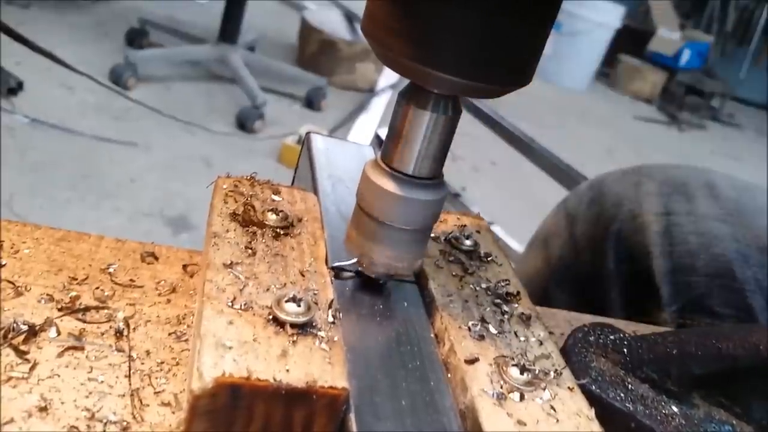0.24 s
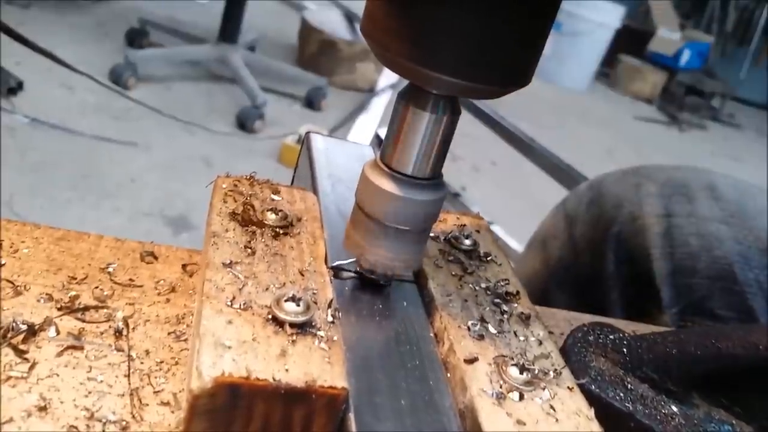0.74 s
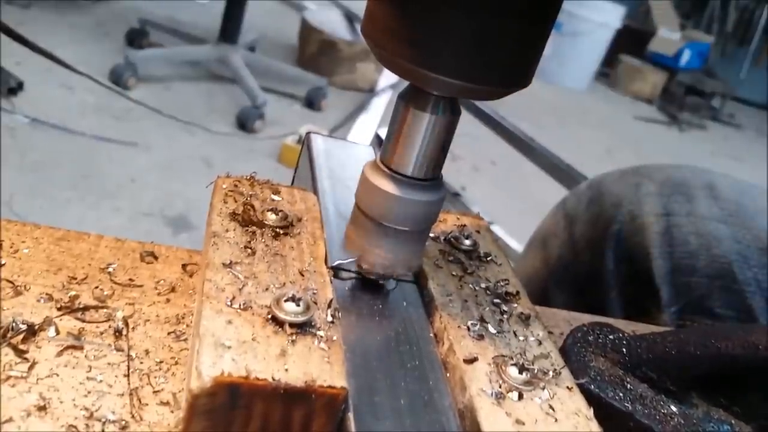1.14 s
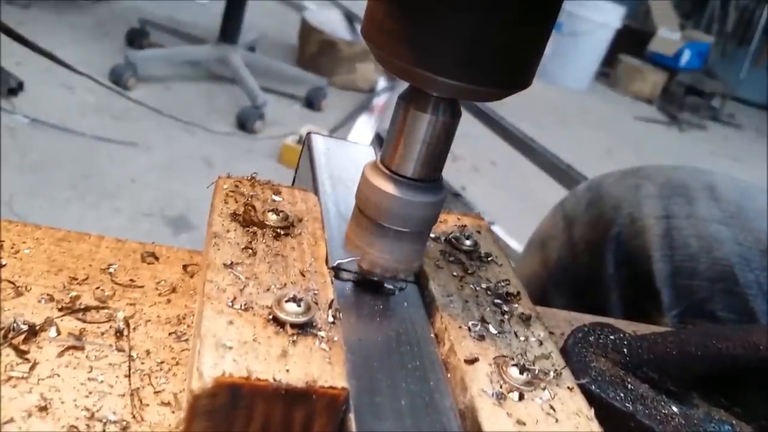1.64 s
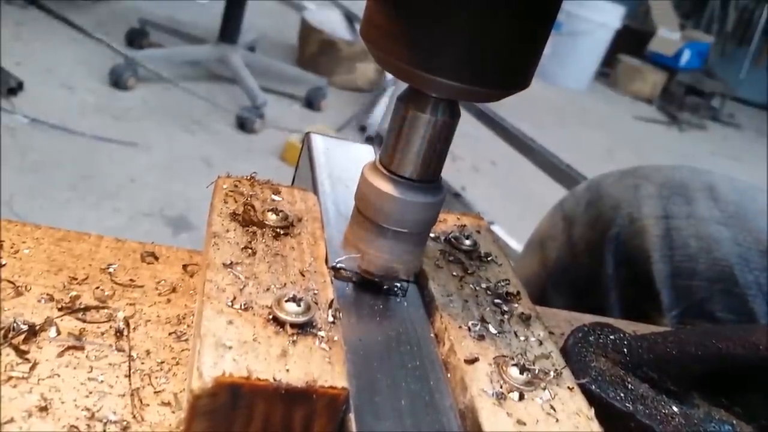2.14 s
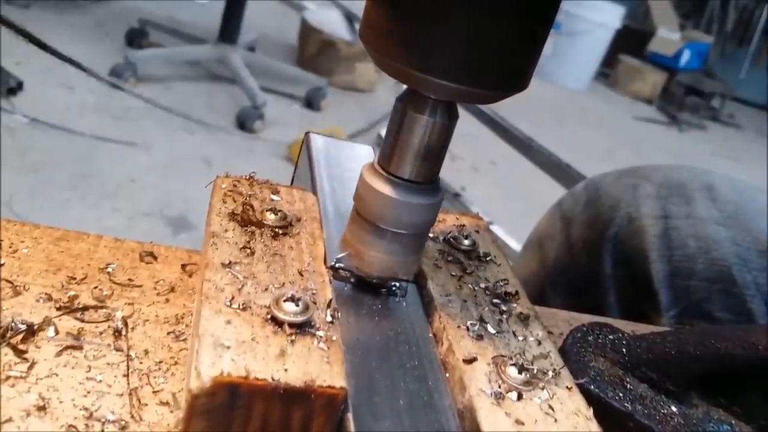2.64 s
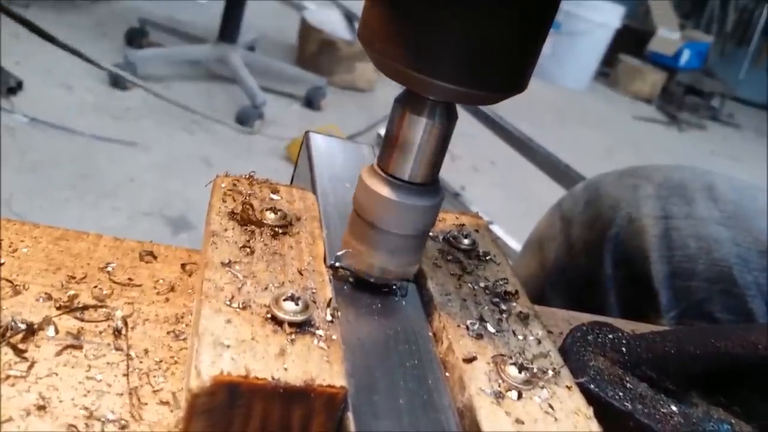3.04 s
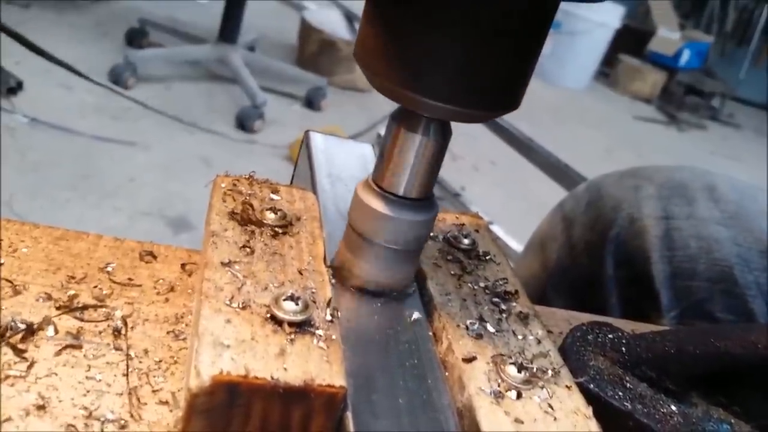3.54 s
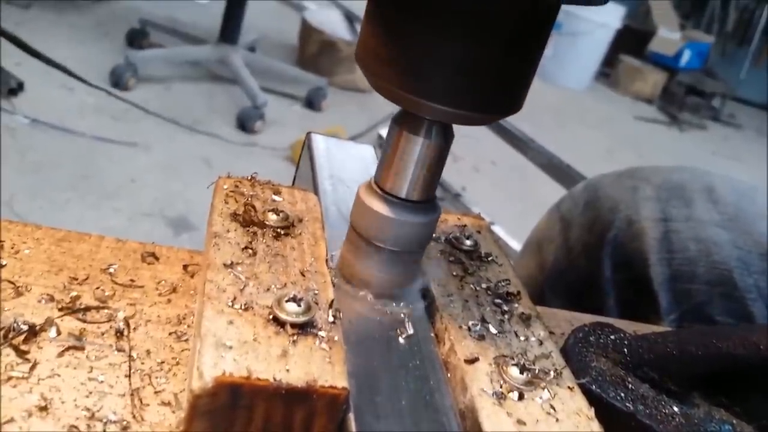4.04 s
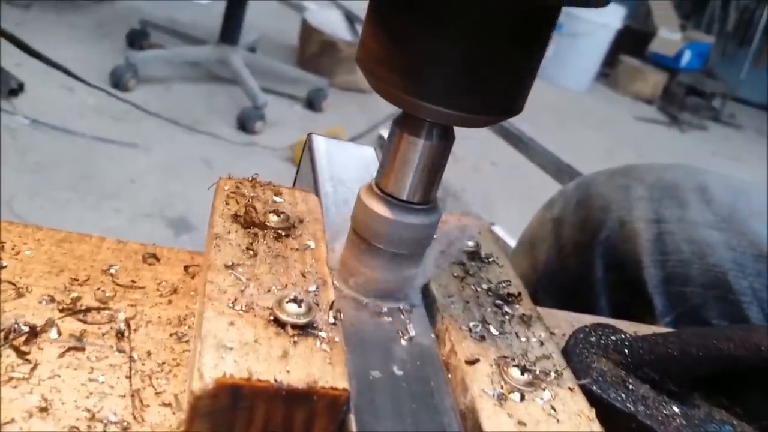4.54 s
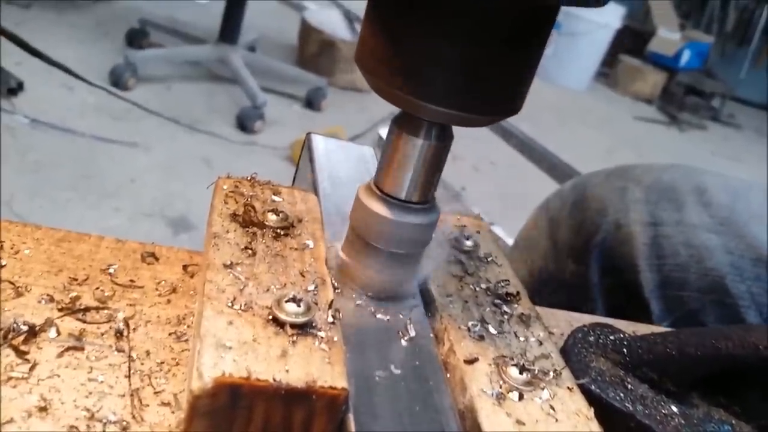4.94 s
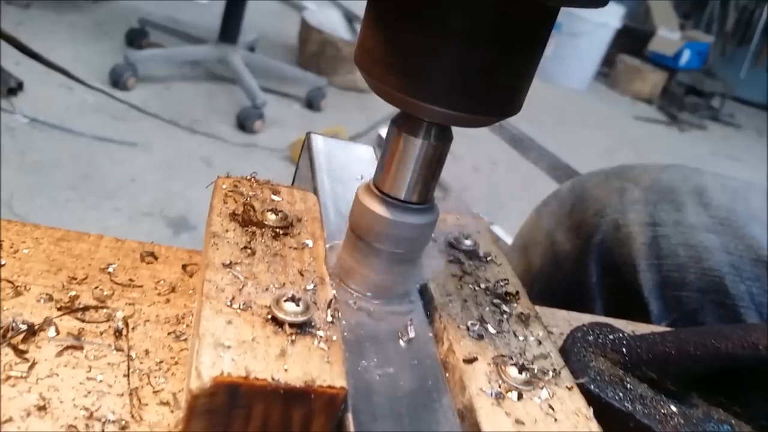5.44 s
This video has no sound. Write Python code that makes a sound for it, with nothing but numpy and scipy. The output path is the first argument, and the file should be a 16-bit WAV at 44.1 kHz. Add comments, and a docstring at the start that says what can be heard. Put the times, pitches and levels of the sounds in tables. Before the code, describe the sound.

In a workshop, very close, a hole saw cuts a clamped steel tube: bright gritty hiss, coarse rasp, snapping chips, low motor hum and bench rumble. A sharp clacking knock comes early. The cut grows harsher, with ringing chatter and rattle, then eases into smooth scraping and tiny high chirps. A loud, piercing squeal takes over, throbbing quickly and turning hoarse until the end.

```python
"""A hole saw in a drill press, close by, cuts a steel tube clamped on a wooden bench: brittle fracture tears chips
in a gritty hiss of random impulses, and excited modes make the tube rasp and ring as the cut deepens.
When the teeth stop biting and rub, thin chirps once a turn lead into a loud squeal, a stick-slip tone
with overtones that throbs twice a turn, hoarse at times with judder.
Beneath lie the motor's hum, bench rumble, a loose rattle, one sharp knock and two softer blows, all damped modes or noise."""
import sys
import numpy as np
from scipy import signal
from scipy.fft import rfft, irfft
from scipy.io import wavfile
from scipy.ndimage import uniform_filter1d, minimum_filter1d, map_coordinates

SR = 44100
rng = np.random.default_rng(int(sys.argv[2]) if len(sys.argv) > 2 else 0)


def transcribe(u):
    """Save the signal u as a 16-bit wav file named by the first command-line argument.

    u: samples, shape (n,) or (channels, n), limited to [-1, 1]; the rate is SR.
    q: integer samples, one column per channel.
    """
    v = np.clip(np.atleast_2d(u).T, -1, 1)
    q = np.round(v * 32767).astype(np.int16)
    wavfile.write(sys.argv[1], SR, q)


N = 251370
TIME = np.arange(N) / SR  # s

# Feed of the saw into the steel. Each row: time in seconds, relative hiss level in dB.
FEED = [(0, -23), (.78, -24), (1.28, -28), (1.55, -27), (2.0, -23.5), (2.5, -22.5), (3.0, -23.5),
        (3.65, -23.5), (4.0, -28), (4.22, -25.5), (4.4, -21.5), (4.9, -22.5), (5.4, -21.5), (5.7, -23.5)]
# Short squeaks of single teeth. Each row: peak time in seconds, pitch in Hz, nominal level in dB,
# half length in seconds.
SQUEAKS = [(2.123, 1730, -32, 0.019), (2.602, 1086, -32, 0.017), (2.883, 8630, -22, 0.015),
           (3.712, 14200, -12.5, 0.016), (3.824, 14140, -11, 0.016), (3.948, 14220, -8, 0.012),
           (4.069, 14150, -20, .005), (4.06, 11800, -24.5, 0.011), (4.073, 2190, -28.5, 0.0056),
           (4.103, 2130, -31.5, 0.0078), (4.126, 3150, -35.5, 0.019), (4.195, 11850, -22, 0.011),
           (4.256, 11900, -20.5, 0.016), (4.62, 11970, -21.5, 0.0073), (4.971, 6980, -17.5, 0.01),
           (5.19, 6300, -33, .007), (5.32, 6430, -27, 0.008), (5.322, 2080, -36.5, .008),
           (5.35, 7100, -20, 0.0068), (5.374, 2160, -29.5, .011), (5.376, 10600, -27, .011),
           (5.462, 2105, -35, 0.013), (5.465, 6800, -19, 0.0086), (5.508, 6300, -26, 0.0072),
           (5.509, 2116, -35, 0.01), (5.615, 6530, -38, 0.0062), (5.631, 2070, -33.5, 0.021),
           (5.632, 4120, -24, 0.014), (5.678, 6700, -21, 0.004)]
# The largest chips snapping off. Each row: time in seconds, relative peak in dB.
SNAPS = [(.09, -7), (0.114, -14), (.5038, -19), (.622, -14), (0.647, -3), (.651, -24), (0.924, -10),
         (1.1558, -13), (1.789, -10.5), (1.906, -13), (1.9974, -17), (2.6644, -10), (2.765, -10),
         (2.769, -10), (3.008, -11), (3.199, -1), (3.3029, -22), (3.318, -8), (3.416, -6), (3.465, -9),
         (3.5085, -9), (3.5493, -6)]
# Damped modes rung by a blow. Each row: frequency in Hz, relative level in dB, 60 dB decay time in seconds.
KNOCK_MODES = [(273.5, -31, 0.88), (375, -33, 0.62), (615, -26, 0.23), (678, -18, 0.18), (800, -28, .13),
               (950, -28, 0.1), (1060, -1, 0.0081), (1130, -34, .12), (1285, -24, 0.28),
               (1370, -16.5, 0.12), (1470, -28, 0.052), (2030, -28, .03)]
# Resonances of the tube. Each row: frequency in Hz, width in Hz, relative level in dB.
TUBE_MODES = [(556, 14, -2), (1083, 22, -.5), (1730, 17, 1.5), (2450, 35, -10), (3250, 26, -.5),
              (4120, 90, 0), (8660, 150, 0), (13000, 600, -18)]
# Blows on the press. Each row: time in seconds, relative ring level in dB, relative thud level in dB,
# softness of the contact in seconds.
KNOCKS = [(.8277, -.5, -37, .00003), (2.114, -18, -39, .007), (5.516, -52, -31.5, .002)]
# Brief dips of the hiss beside the knock and two loud chirps, as a limiter ducks it.
# Each row: time in seconds, dip in dB, recovery in seconds.
DIPS = [(.835, 4.5, 0.022), (3.816, 6, 0.029), (3.927, 7.5, 0.043)]
# Bright rips as a thick chip curls off. Each row: time in seconds, extra treble in dB.
RIPS = [(2.325, 4), (2.418, 13.5), (2.478, 4.5), (2.592, 6), (2.865, 8)]
# Lapses in the squeal's grip. Each row: time in seconds, dip in dB, half length in seconds.
LAPSES = [(4.357, 13, 0.0031), (4.396, 7, 0.0028), (4.473, 6.5, 0.0042), (4.528, 8.5, 0.0041),
          (4.599, 5, 0.019), (4.635, 13.5, 0.0038), (4.751, 14.5, 0.0037), (4.836, 2, .002),
          (4.888, 2, 0.0057), (4.914, 3, 0.013), (5.02, 8, 0.0037), (5.094, 5.5, 0.0047),
          (5.155, 6.5, 0.0035), (5.22, 9.5, 0.0036), (5.265, 4, 0.0024), (5.344, 9.5, 0.0026),
          (5.388, 8.5, 0.0048), (5.457, 6.5, .004), (5.482, 7, 0.0053), (5.522, 11, 0.0044),
          (5.606, 7.5, 0.0093), (5.631, 8.5, 0.013)]
# Spells of hoarse judder. Each row: start in seconds, end in seconds, relative level in dB.
JUDDERS = [(4.063, 4.22, -25), (4.33, 4.395, -26), (5.065, 5.277, -23), (5.3, 5.72, -22)]
# Direction of the saw's treble past the two microphones. Each row: frequency in Hz, left minus right in dB.
BEAM = [(500, -82), (1500, -3.5), (3000, -2.5), (5000, 1.5), (7000, 8.5), (8500, -6.5), (10000, -5.5),
        (12500, 2)]

# Spectra of the noises: hiss while cutting, hiss while rubbing, rasp on the tube, bench rumble, rattle,
# crack and wood of a blow, snapping chips, coarse scrape, hoarse rasp.
# Each row: frequency in Hz, relative spectral level in dB.
CUT_COLOUR = [(60, -42), (400, -31), (1000, -26), (2000, -16.5), (3000, -12.5), (3800, -12.5), (4750, -9.5),
              (5080, -6), (5400, -5.5), (5900, -5), (6300, -5), (6750, 0), (7200, 0.6), (7600, -6.5),
              (8600, -8), (9500, -15), (11500, -18.5), (13000, -25), (14500, -35)]
RUB_COLOUR = [(900, -43), (1600, -18.5), (2150, -18), (2600, -7.5), (3500, -5.5), (4400, -2), (5400, -5),
              (6500, 4), (7050, 5.5), (7800, -2), (8600, 8), (9600, -6), (11200, -5.5), (12300, -2),
              (14400, -19)]
RASP_COLOUR = [(200, -16), (450, 3), (700, -3.5), (1000, 0), (1400, -4), (1900, 2.5), (2600, -4),
               (4000, -23)]
BENCH_COLOUR = [(25, -45), (60, -42), (100, -0.5), (160, -9.5), (240, -6.5), (295, -11), (330, 10.5),
                (370, 7), (410, -2.5), (600, -42), (1000, -16.5)]
RATTLE_COLOUR = [(45, -30), (110, 9), (170, 6), (260, 10), (380, -15), (480, 8), (700, -7), (1500, -7),
                 (3000, -21)]
CRACK_COLOUR = [(60, -40), (350, -20), (600, 3), (1500, 3), (2400, -3), (4200, -3), (8000, -32)]
WOOD_COLOUR = [(60, -44), (400, -10), (560, -6), (1420, 0), (1800, -11), (5000, -48)]
SNAP_COLOUR = [(100, -60), (2000, -34), (4200, -25), (5200, 3.5), (6200, -2), (7000, 8.5), (8500, -4),
               (10000, -8), (14500, -21.5)]
SCRAPE_COLOUR = [(2500, -32), (4800, 3), (7800, 5), (10000, -7), (12500, -1), (14500, -10)]
HOARSE_COLOUR = [(1300, -41), (1900, -13.5), (2140, 16), (2400, -22), (2750, 12), (3400, -54)]

# Stages of the cut. Each holds: start in seconds, rise in seconds, end in seconds, fall in seconds.
DEEP_CUT = (2, 0.29, 3.14, 0.55)  # the whole rim bites: brighter and wider
SCRAPING = (2.3, 0.17, 2.81, 0.2)  # the deepest part scrapes coarsely
CHATTERING = (2.134, 0.14, 2.964, 0.17)  # the tube's walls ring
LOOSE_TUBE = (2.41, 0.8, 4.28, 1.38)  # the tube rattles on the wood
SQUEALING = (4.272, .025, 5.86, .4)
OVERTONES = (4.268, .025, 5.78, .72)  # they begin to fade before the squeal does

SPINDLE_HZ, MAINS_HZ = 8.09, 60
# the teeth begin to slide, the low sounds fade, the squeal first catches (s)
SLIDE_S, SLIDE_RISE_S, LOW_FADE_S, LOW_FADE_LENGTH_S, RUB_S = 3.97, 0.35, 3.98, 0.52, 4.185
USUAL_FEED_DB = -23
DIP_ONSET_S = 0.0085
# small chips break all the time: the force jumps and dies away
CHIPS_PER_S, CHIP_FORCE, CHIP_DECAY_S = 70, .26, .003

# treble of the hiss while cutting, its change in the deep cut and its change while rubbing
BRIGHT_DB, DEEP_BRIGHT_DB, RUB_BRIGHT_DB = 0.1, 1.5, -3.5
# the same for its balance, left minus right, applied on top of the beam
HISS_PAN_DB, DEEP_PAN_DB, RUB_PAN_DB = 10, -4.5, -4
SNAP_DECAY_S, RIP_S = .005, 0.049
SCRAPE_DB, SCRAPE_RIP_SHARE = -29, .8
PORT_LAG, SQUEAL_LAG = 18, 1  # delay of the right microphone (samples)
# how deeply nearby echoes comb the hiss and the rasp
HISS_COMB_DB, RASP_COMB_DB = 1.7, 3.8

# nominal level at the usual feed, and how far each drops once the low sounds have faded
RASP_DB, RASP_DROP_DB = -35, 52
HUM_DB, HUM_DROP_DB = -45, 21
BENCH_DB, BENCH_DROP_DB = -39.5, 25
CHATTER_DB, RATTLE_DB = -25.5, -40.5
# self-fed chatter evens out its swing (0 free ringing, 1 steady)
CHATTER_HOLD, MODE_SWELL_DB = .4, 1.0

# the squeal starts sharp and settles as the cup heats; a light grip sings sharper than a firm one
SQUEAL_HZ, SHARP_HZ, SETTLE_S, LIGHT_GRIP_HZ = 4206, 80, .22, 60
SQUEAL_DB, OCTAVE_DB, THIRD_DB = -11.9, -14.5, -28  # nominal peak of each partial
CATCH_DB, CATCH_HALF_S, CATCH_OVERTONES_DB = -3.5, .008, 3  # the first catch is shrill
WHISPER_DB, WHISPER_S, WHISPER_RISE_S = -13, 4.09, 0.15  # it creeps in before it catches
COLD_DB, WARM_UP_S = 3, 0.54  # it starts a little weaker and builds
# random breaks of the grip, ever more as the cut heats: at first per s, more per s each second
BREAKS_PER_S, BREAKS_GROWTH, BREAK_DIP_DB, BREAK_RECOVERY_S = 35, 45, 6.5, .0024
SQUEAK_GLIDE = 0.004  # fraction of the pitch, either way
JUDDER_EDGE_S, JUDDER_WET_DB, HOARSE_DB = 0.011, -7, -23

THUD_S = 0.0019  # the bench gives softly
WALL_ECHO_S, WALL_ECHO_DB = 0.017, -21  # a near wall scatters each blow back
KNOCK_ROOM_T60_S = .38
TOP_HZ = 14650


def undb(db):
    """The decibel law: amplitude gain is ten to the power dB / 20."""
    return 10 ** (np.asarray(db) / 20)


def curve(rows):
    """Linear interpolation in time of every column after the first."""
    s, *columns = np.transpose(rows)
    return [np.interp(TIME, s, c) for c in columns]


def unit(x):
    """Normalisation: each channel gets a root-mean-square value of one."""
    return x / np.sqrt(np.mean(x ** 2, axis=-1, keepdims=True))


def pan(balance_db):
    """Constant-power panning: left and right gains for a level difference, left minus right."""
    gains = undb(np.array([[.5], [-.5]]) * balance_db)
    return gains / np.sqrt(np.mean(gains ** 2, axis=0))


def walk(rate):
    """Band-limited random wandering: cubic interpolation of rate Gaussian knots per second, rms one."""
    knots = rng.standard_normal(4096)
    return unit(map_coordinates(knots, [TIME * rate], order=3, mode="wrap"))


def ramp(start, length):
    """Linear onset: rises from 0 to 1 over length s."""
    return np.clip((TIME - start) / max(length, .001), 0, 1)


def stage(start, rise, end, fall):
    """Envelope of attack, hold and release, from 0 to 1 and back."""
    return ramp(start, rise) * (1 - ramp(end - fall, fall))


def bump(s, half_s):
    """Gaussian pulse in time, with a peak of one."""
    return np.exp(-((TIME - s) / half_s) ** 2 / 2)


def shape(points):
    """Spectral envelope: a table of Hz and dB interpolated over log frequency."""
    hz, db = np.transpose(points)
    return np.interp(np.log(np.fft.rfftfreq(N, 1 / SR) + 1), np.log(hz), db)


def colour(x, points):
    """Linear filtering: the spectrum is multiplied by an envelope, then scaled to an rms of one."""
    return unit(irfft(rfft(x) * undb(shape(points)), N))


def workshop(x, wet_db, t60, lag=0):
    """Reverberation: direct sound, lag samples late at the right, plus exponentially decaying diffuse echoes."""
    tail = rng.standard_normal((2, N)) * undb(-60 * TIME / t60) * (TIME > .001)
    echoes = unit(signal.fftconvolve(tail, x[None], axes=1)[:, :N])
    direct = unit(np.array([x, np.pad(x, (lag, 0))[:N]]))
    return unit(direct + undb(wet_db) * echoes) * np.std(x)


def scatter(x, depth_db, spacing_hz):
    """Interference: echoes off press and bench comb each channel's spectrum into fine random peaks and dips."""
    place = np.fft.rfftfreq(N, 1 / SR) / spacing_hz
    comb = np.array([map_coordinates(rng.standard_normal(2048), [place], order=3, mode="wrap") for _ in range(2)])
    return unit(irfft(rfft(x) * undb(depth_db * comb), N))


def fractures(per_s, spread_db):
    """Brittle fracture: a random train of tiny breaks of either sign, a few of them large."""
    chance = rng.random(N)
    size = np.minimum(rng.exponential(size=N), 5)
    return unit((chance < per_s / SR) * rng.choice([-1, 1], N) * undb(spread_db * size))


def crackle(per_s, spread_db, shared, lag=0):
    """Partial coherence: some breaks reach both microphones, the right one lag samples late, the rest only one."""
    both, left, right = (fractures(per_s, spread_db) for _ in range(3))
    common = np.array([both, np.pad(both, (lag, 0))[:N]])
    return np.sqrt(shared) * common + np.sqrt(1 - shared) * np.array([left, right])


def feed():
    """Level law of the cut: the hiss level in dB follows the hand's pressure, less a few brief dips."""
    dips = 0
    for s, db, recovery_s in DIPS:
        recovery = np.exp(-(np.maximum(TIME - s, 0) / recovery_s) ** 2)
        dips = dips + db * ramp(s - DIP_ONSET_S, DIP_ONSET_S) * recovery
    return curve(FEED)[0] - dips


def bites(uneven_db, flutter_db, ripple, count=24):
    """Force modulation: uneven teeth repeat each turn, chips come and go, the motor's torque ripples."""
    heights = rng.standard_normal(count)
    # a tooth bites only what the teeth just before it have left
    heights = unit(heights - np.roll(heights, 2))
    teeth = np.interp(TIME * SPINDLE_HZ, np.arange(count) / count, heights, period=1)
    torque = 1 + ripple * np.cos(2 * np.pi * 4 * MAINS_HZ * TIME)
    breaks = (rng.random(N) < CHIPS_PER_S / SR) * rng.uniform(.5, 2, N)
    chips = signal.lfilter([CHIP_FORCE], [1, -np.exp(-1 / (CHIP_DECAY_S * SR))], breaks)
    return undb(uneven_db * teeth + flutter_db * walk(90)) * torque * (1 + chips)


def machine(force, effort_db, lows_faded, waver_db=5):
    """Forced vibration: the motor hums at twice the mains frequency, the bench rumbles, the clamped tube rattles."""
    phase = 2 * np.pi * 2 * MAINS_HZ * TIME
    partials = sum(undb(db + 0.54 * walk(9.1)) * np.sin((k + 1) * phase) for k, db in enumerate([0, -15, -8]))
    # the hum follows the effort; from about 4 s it is turned down and its level wavers
    hum_db = HUM_DB + 0.81 * effort_db + lows_faded * (waver_db * walk(16) - HUM_DROP_DB)
    hum = unit(partials) * undb(hum_db)
    bench_db = BENCH_DB + effort_db - BENCH_DROP_DB * lows_faded + (1.05 + 4.3 * lows_faded) * walk(13)
    shaking = crackle(per_s=2500, spread_db=2.0, shared=0.55) * force
    rumble = colour(shaking, BENCH_COLOUR) * undb(bench_db)
    rattle = colour(fractures(180, 3.5), RATTLE_COLOUR) * undb(RATTLE_DB) * stage(*LOOSE_TUBE)
    return hum * pan(2.7) + (rumble + workshop(rattle, wet_db=-1.5, t60=0.22)) * pan(2.1)


def knocks(thud_hz=85):
    """Impact: a dry clack, a woody burst and its echo, damped ringing modes and a thud through the bench."""
    blows, thuds = 0, 0
    crack = colour(rng.standard_normal(N), CRACK_COLOUR)
    wood = colour(rng.standard_normal(N), WOOD_COLOUR)
    for s, ring_db, thud_db, soft_s in KNOCKS:
        age = np.maximum(TIME - s, 0)
        ring = sum(undb(db - 60 * age / t60) * np.sin(2 * np.pi * hz * age) for hz, db, t60 in KNOCK_MODES)
        burst = undb(-4.5) * crack * np.exp(-age / 0.0019) + undb(-24) * wood * np.exp(-age / 0.013)
        echo_swing = (age > WALL_ECHO_S) * np.exp(-abs(age - WALL_ECHO_S) / 0.016)
        echo = undb(WALL_ECHO_DB) * wood * echo_swing
        # a soft contact blunts the attack
        blows = blows + undb(ring_db) * (ring + burst + echo) * (1 - np.exp(-age / soft_s))
        thud_swing = age / THUD_S * np.exp(1 - age / THUD_S) / 2
        thuds = thuds + undb(thud_db) * np.sin(2 * np.pi * thud_hz * age) * thud_swing
    # small parts radiate little bass
    blows = signal.sosfilt(signal.butter(3, 380, "high", fs=SR, output="sos"), blows)
    return workshop(blows, wet_db=-5.5, t60=KNOCK_ROOM_T60_S) * pan(-5.5) + thuds


def tube(force, effort_db, lows_faded):
    """Resonance: the teeth rasp on the tube and, pressed hardest, ring its modes, each swelling in its own time."""
    teeth = scatter(crackle(per_s=5000, spread_db=2.0, shared=0.13), depth_db=RASP_COMB_DB, spacing_hz=24.95)
    rasp_db = RASP_DB + effort_db - RASP_DROP_DB * lows_faded ** 1.4
    rasp = colour(teeth * force, RASP_COLOUR) * undb(rasp_db)
    freq = np.fft.rfftfreq(N, 1 / SR)
    drive = rfft(crackle(per_s=3000, spread_db=2.5, shared=0.2) * force)
    ring = 0
    for hz, width, db in TUBE_MODES:
        response = 1j * freq * width / (hz ** 2 - freq ** 2 + 1j * freq * width)
        free = irfft(drive * response, N)
        held = unit(free / abs(signal.hilbert(free)) ** CHATTER_HOLD) * np.std(free)
        ring = ring + held * undb(db + MODE_SWELL_DB * walk(18))
    chatter = unit(ring) * undb(CHATTER_DB) * stage(*CHATTERING)
    return rasp * pan(5.9) + chatter * pan(-0.69)


def judder(throb, hz=2135):
    """Period doubling: every second slip goes astray, giving odd partials of about half the squeal's pitch."""
    spells = sum(undb(db) * stage(start, JUDDER_EDGE_S, end, JUDDER_EDGE_S) for start, end, db in JUDDERS)
    phase = 2 * np.pi * np.cumsum(hz + 30 * walk(60) + 50 * walk(900)) / SR
    tone = unit(undb(-23) * np.sin(phase) + np.sin(3 * phase) + undb(-13) * np.sin(5 * phase))
    # a screech from the cup
    screech = colour(fractures(2200, 0.94), [(5400, -62), (6300, -6), (6900, 37), (7250, -45), (8200, -51)])
    bursts = spells * undb(-4.5 + 2.5 * throb + 7 * np.tanh(walk(120)))
    voice = (tone + undb(-14.5) * screech) * bursts
    noise = colour(crackle(per_s=900, spread_db=1.5, shared=0.3), HOARSE_COLOUR)
    rasp = noise * spells * undb(HOARSE_DB + 2 * walk(90))
    return workshop(voice, wet_db=JUDDER_WET_DB, t60=0.048, lag=SQUEAL_LAG) * pan(26.0) + rasp


def squeaks():
    """Brief stick-slip: a tooth catches and one mode of the cup or tube leaps up, holds and dies."""
    # once the saw only rubs, the squeaks turn hoarse
    hoarse = ramp(RUB_S, 1)
    waver_hz = (40 + 15 * hoarse) * walk(700)
    grip = undb(3.2 * walk(320) - 2 * hoarse)
    out = 0
    for s, hz, db, half_s in SQUEAKS:
        age = np.clip((TIME - s) / half_s, -6, 6)
        phase = 2 * np.pi * np.cumsum(hz * (1 + SQUEAK_GLIDE * np.tanh(age)) + waver_hz) / SR
        out = out + undb(db) * np.exp(-age ** 4 / 2) * np.sqrt(2) * np.sin(phase)
    return workshop(out * grip, wet_db=-13, t60=.2, lag=SQUEAL_LAG) * pan(1.5)


def squeal(throb):
    """Stick-slip oscillation: the cup grips the wall of the cut, swelling as each of two high spots comes round."""
    # it catches once, sinks to a whisper, and takes hold
    catch = bump(RUB_S, CATCH_HALF_S)
    whisper = undb(WHISPER_DB) * ramp(WHISPER_S, WHISPER_RISE_S)
    held = np.maximum(undb(CATCH_DB) * catch + whisper, stage(*SQUEALING))
    firm = np.maximum(undb(CATCH_OVERTONES_DB) * catch + whisper, stage(*OVERTONES))
    light = 1 - np.maximum(catch, ramp(*SQUEALING[:2]))
    # the swing saturates: broad beats, cut by lapses and many finer breaks
    slips = rng.random(N) < (BREAKS_PER_S + BREAKS_GROWTH * (TIME - RUB_S)) / SR
    breaks = signal.lfilter([BREAK_DIP_DB], [1, -np.exp(-1 / (BREAK_RECOVERY_S * SR))], slips)
    breaks = uniform_filter1d(breaks, size=50)
    lapses = sum(db * bump(s, half_s) for s, db, half_s in LAPSES)
    contact = undb(-lapses - breaks)
    grip = (1 + .75 * throb) ** .29 * contact * undb(.4 * walk(200) + .3 * walk(520))
    grip = grip * undb(-COLD_DB * (1 - ramp(RUB_S, WARM_UP_S)))
    # the pitch starts high, leaps at every break and sags through every swell
    sharp_hz = SHARP_HZ * np.exp(-np.maximum(TIME - RUB_S, 0) / SETTLE_S)
    hz = SQUEAL_HZ + sharp_hz + LIGHT_GRIP_HZ * (light + 1 - contact)
    hz = hz + 5 * walk(22) + 12 * walk(600) - 4 * throb + 5 * unit(np.gradient(throb))
    phase = 2 * np.pi * np.cumsum(hz) / SR
    # envelope, level in dB, left minus right in dB
    partials = [(held, SQUEAL_DB, 5), (firm, OCTAVE_DB, -5), (firm, THIRD_DB, 4)]
    out = 0
    for k, (swing, db, pan_db) in enumerate(partials):
        # the spinning cup sweeps its lobes past each microphone, so every partial flutters
        lobes = 1 + .19 * (k + 1) * np.array([walk(170) + 1j * walk(170) for _ in range(2)])
        partial = grip * swing * undb(db) * np.sin((k + 1) * phase)
        tone = workshop(partial, wet_db=-11, t60=.1, lag=SQUEAL_LAG)
        out = out + np.real(signal.hilbert(tone) * lobes) / np.mean(abs(lobes)) * pan(pan_db)
    return out


def snaps(decay_s):
    """Sudden release of strain: each breaking chip lets go a decaying noise burst a few milliseconds long."""
    burst = sum(undb(db) * (TIME >= s) * np.exp(-abs(TIME - s) / decay_s) for s, db in SNAPS)
    return burst * colour(rng.standard_normal((2, N)), SNAP_COLOUR)


def saw(force, hiss_db, deep, throb):
    """Fracture noise: tearing chips ring the saw's cup; a smoother scrape takes over as the teeth begin to slide."""
    rubbing = ramp(SLIDE_S, SLIDE_RISE_S)
    rim = crackle(per_s=18000, spread_db=2.0, shared=0.23, lag=PORT_LAG)
    rim = scatter(rim, depth_db=HISS_COMB_DB, spacing_hz=58.46)
    tearing = colour(rim * force, CUT_COLOUR)
    sliding = colour(rim * undb(0.13 * throb), RUB_COLOUR)
    blend = np.sqrt(1 - rubbing) * tearing + undb(-3.5) * np.sqrt(rubbing) * sliding
    hiss = undb(hiss_db + 5.0 + 0.2 * walk(18)) * blend
    sound = hiss + undb(-4.0) * snaps(SNAP_DECAY_S)
    # a harder bite is brighter
    rips = sum(db * (TIME > s) * np.exp(-abs(TIME - s) / RIP_S) for s, db in RIPS)
    bright_db = BRIGHT_DB + DEEP_BRIGHT_DB * deep + RUB_BRIGHT_DB * rubbing + rips + 0.72 * walk(28)
    treble = irfft(rfft(sound) * undb(shape([(7400, -28), (9000, -6.5)])), N)
    sound = sound + treble * (undb(bright_db) - 1)
    # balance varies with frequency, then with time
    beamed = irfft(rfft(sound) * pan(shape(BEAM) + 8) / pan(9.6), N)
    pan_db = HISS_PAN_DB + DEEP_PAN_DB * deep + RUB_PAN_DB * rubbing
    coarse = colour(crackle(per_s=2500, spread_db=2.5, shared=0.2), SCRAPE_COLOUR)
    scrape = coarse * force * undb(SCRAPE_DB + SCRAPE_RIP_SHARE * rips + 2.5 * walk(70))
    return beamed * pan(pan_db) + scrape * stage(*SCRAPING)


def scene():
    """Superposition: cutting gives way to rubbing, while the feed drives hiss, rasp, hum and rumble alike."""
    force = bites(uneven_db=0.83, flutter_db=0.76, ripple=0.096)
    hiss_db, deep, lows_faded = feed(), stage(*DEEP_CUT), ramp(LOW_FADE_S, LOW_FADE_LENGTH_S)
    effort_db = hiss_db - USUAL_FEED_DB
    # two swells a turn, with slight wander
    throb = np.cos(2 * np.pi * 2 * SPINDLE_HZ * (TIME - RUB_S) + .35 * walk(22))
    background = machine(force, effort_db, lows_faded) + knocks()
    rubbing = judder(throb) + squeaks() + squeal(throb)
    return background + tube(force, effort_db, lows_faded) + rubbing + saw(force, hiss_db, deep, throb)


def record(dry):
    """Band limiting and peak limiting: a steep low-pass, then smoothed gain reduction under full scale."""
    sound = signal.sosfilt(signal.ellip(10, .2, 80, TOP_HZ, fs=SR, output="sos"), dry)
    headroom = np.minimum(1, .97 / (abs(sound).max(axis=0) + 1e-9))
    return sound * uniform_filter1d(minimum_filter1d(headroom, size=201), size=201)


dry = scene()
out = record(dry)
transcribe(out)
```